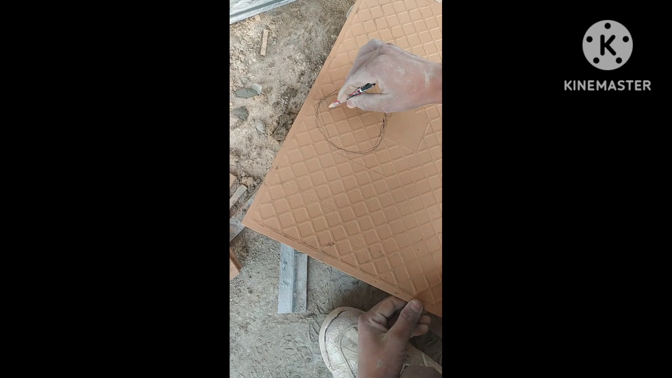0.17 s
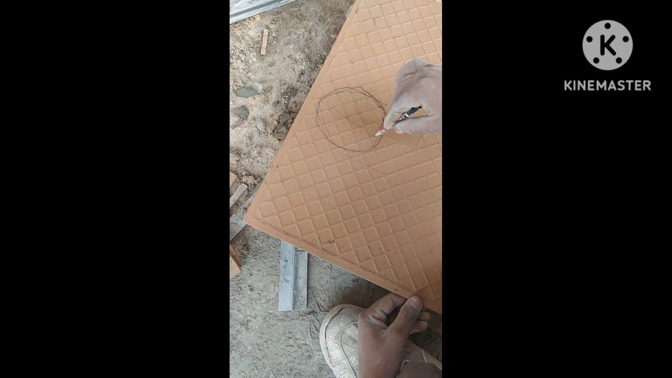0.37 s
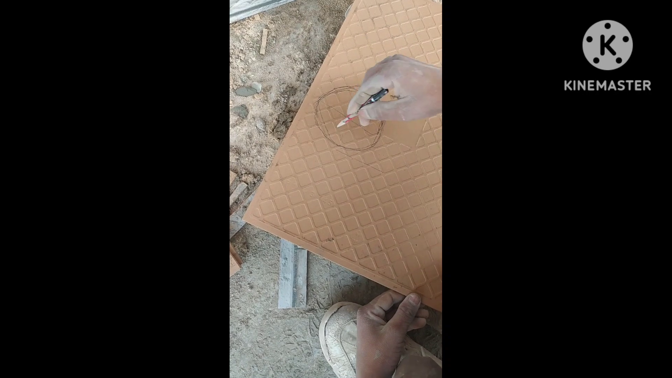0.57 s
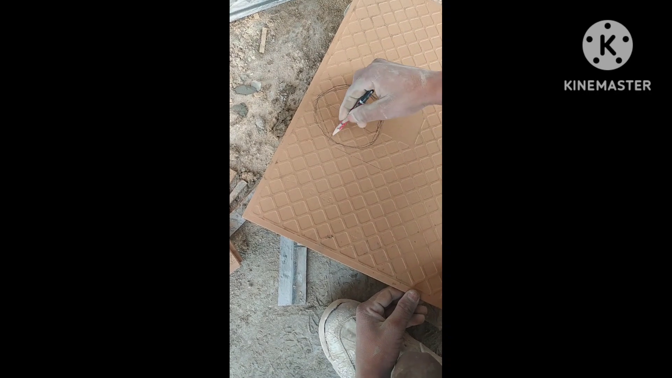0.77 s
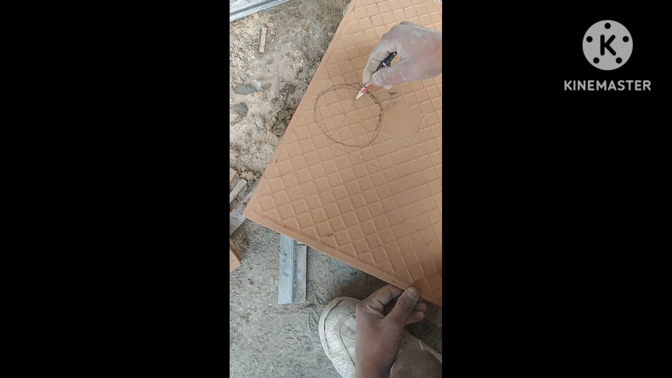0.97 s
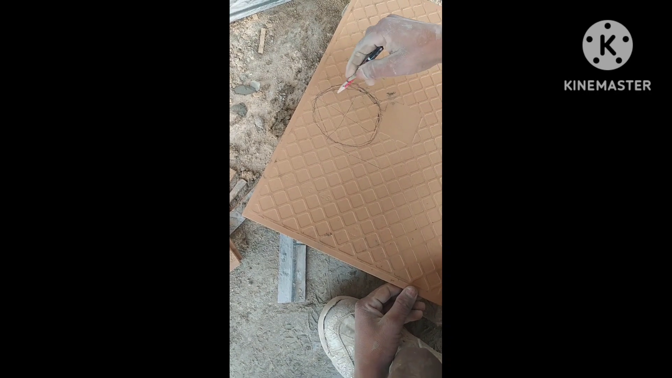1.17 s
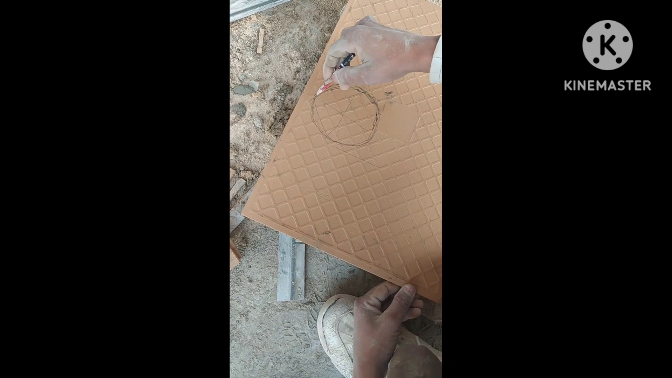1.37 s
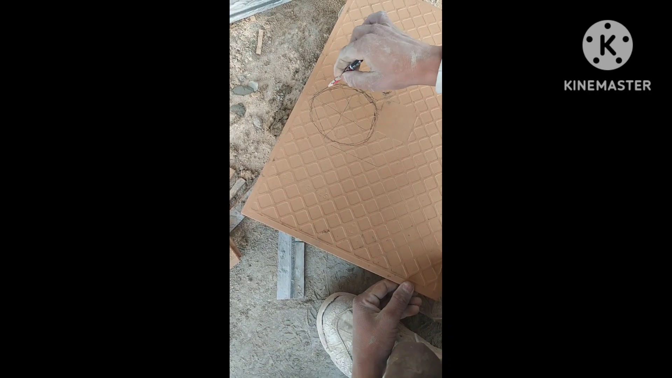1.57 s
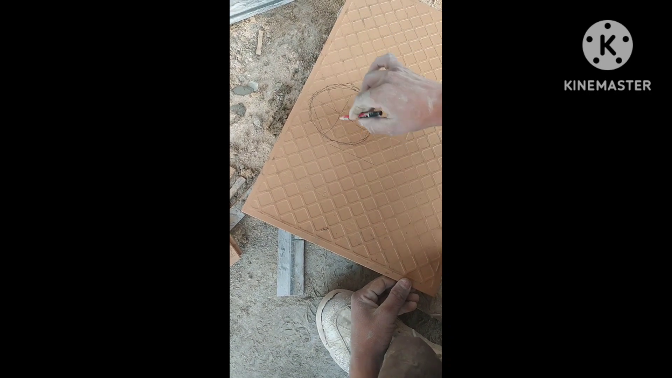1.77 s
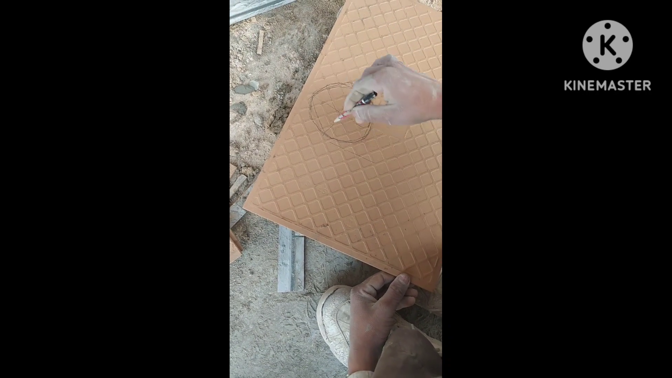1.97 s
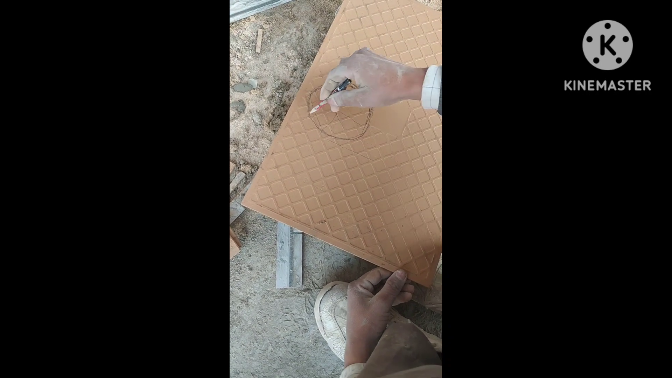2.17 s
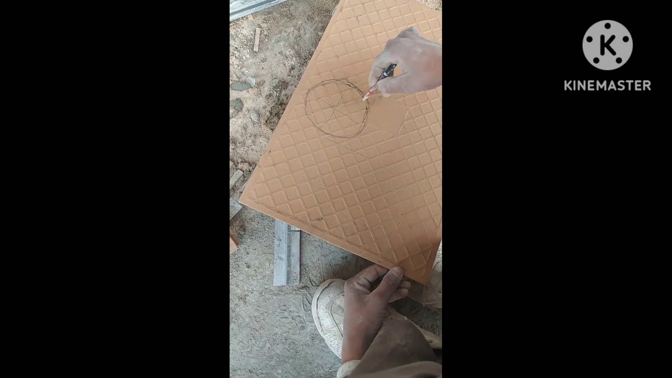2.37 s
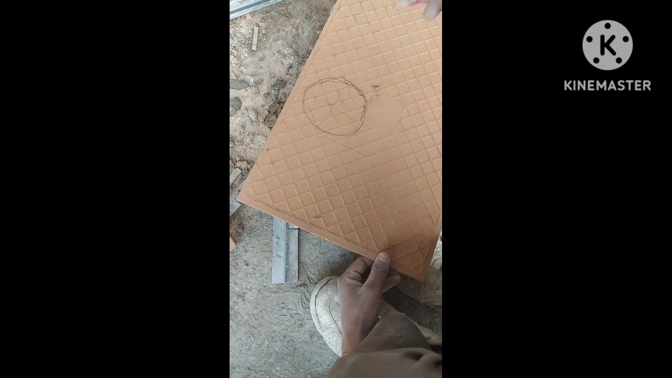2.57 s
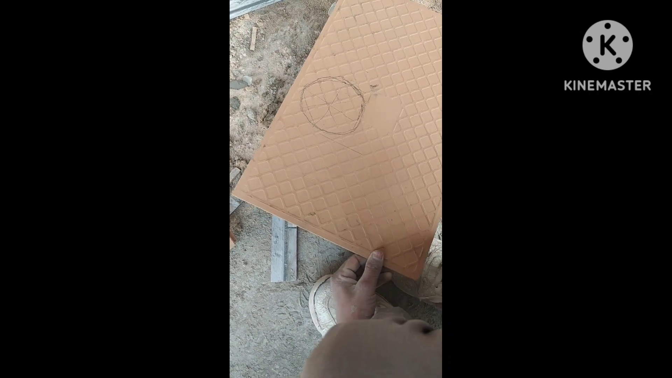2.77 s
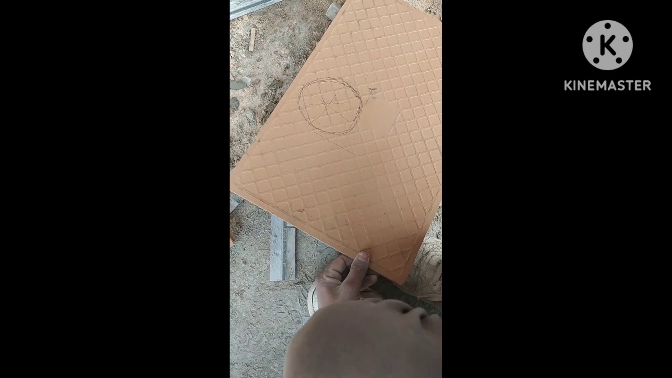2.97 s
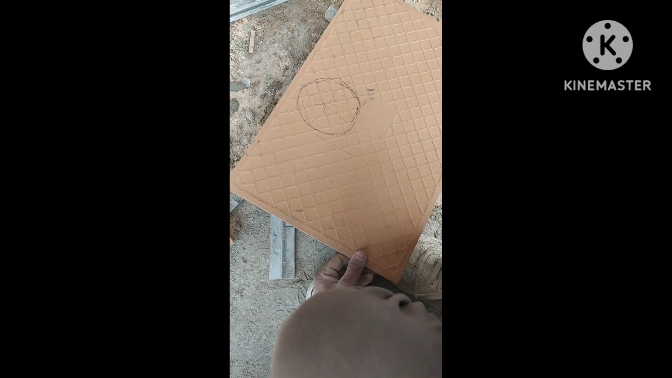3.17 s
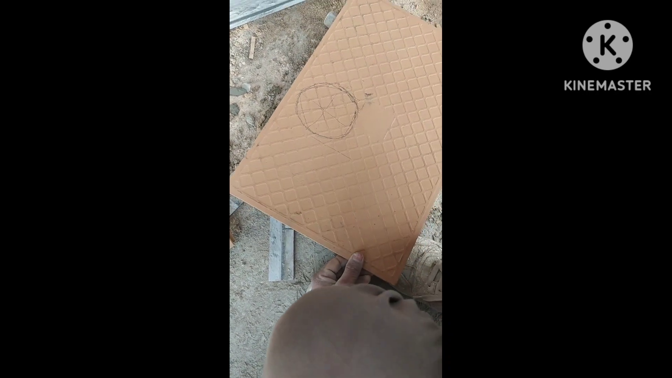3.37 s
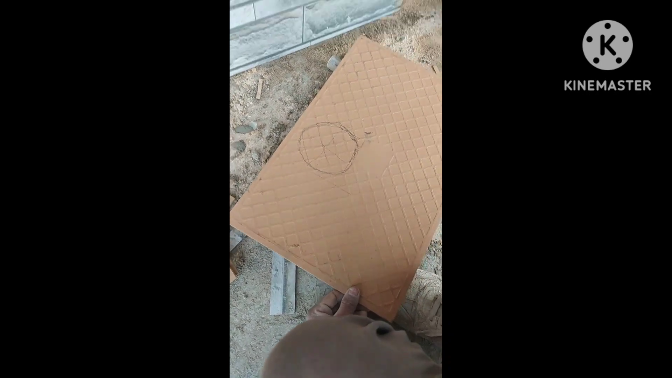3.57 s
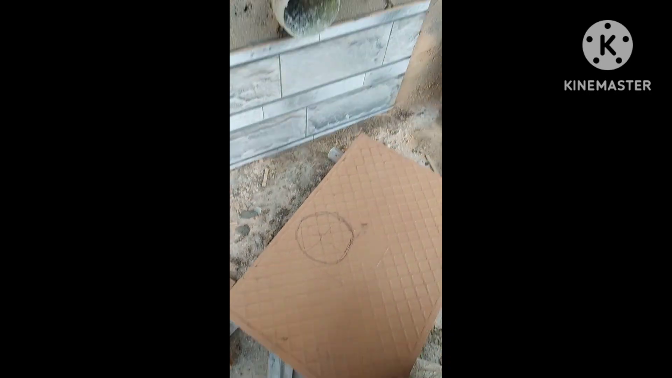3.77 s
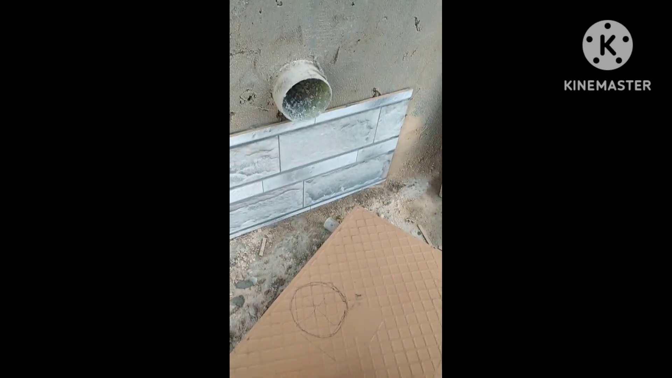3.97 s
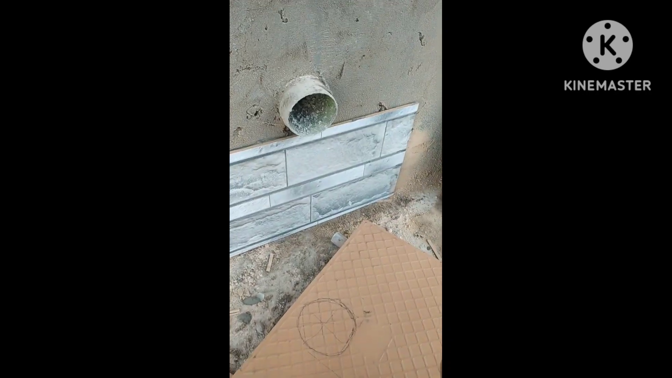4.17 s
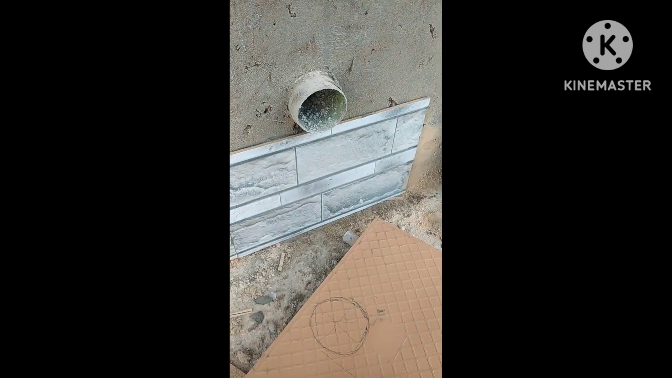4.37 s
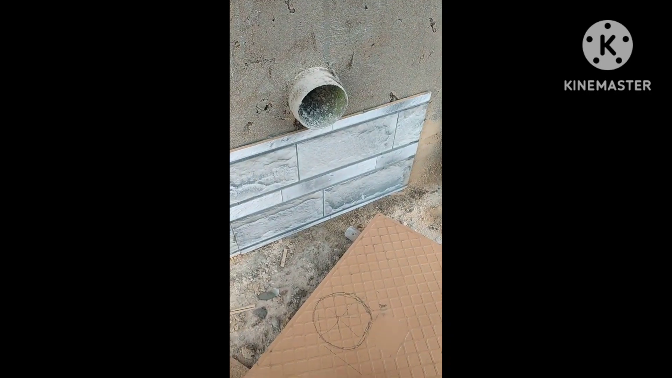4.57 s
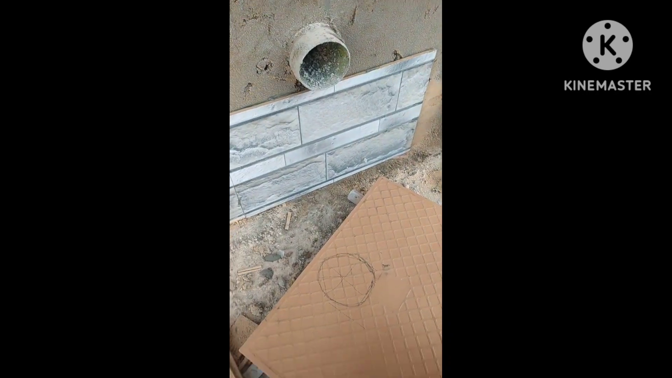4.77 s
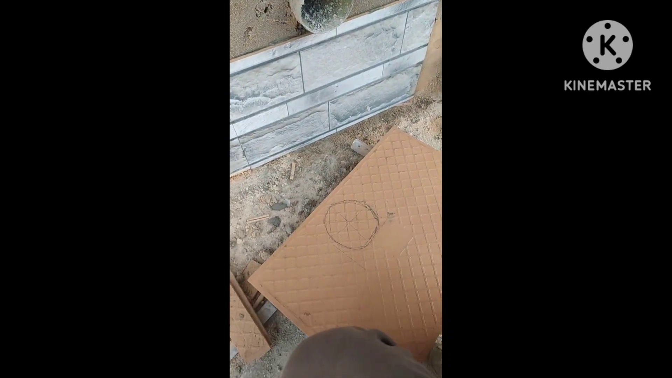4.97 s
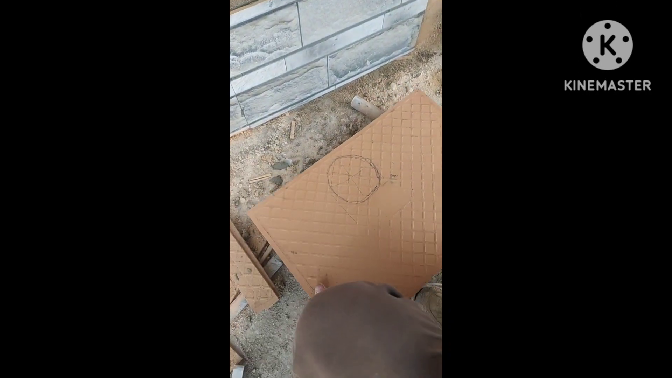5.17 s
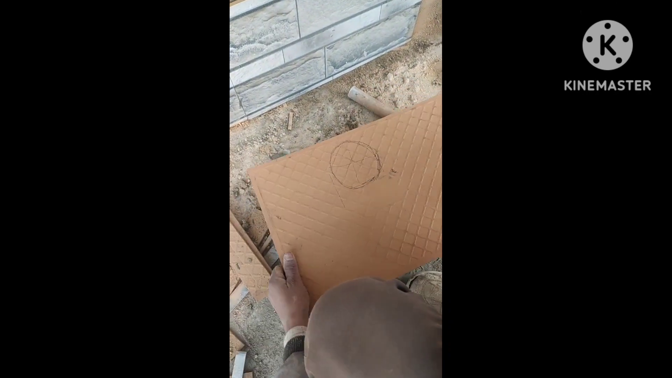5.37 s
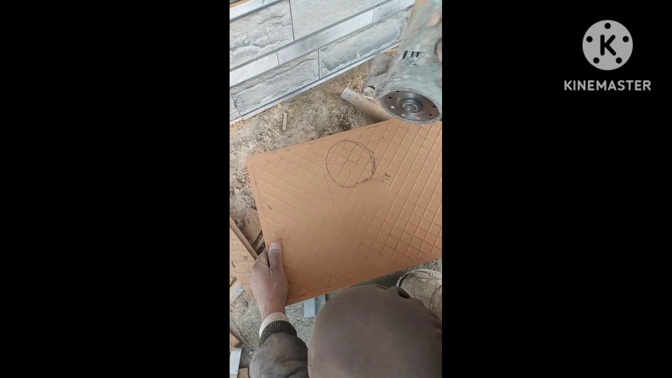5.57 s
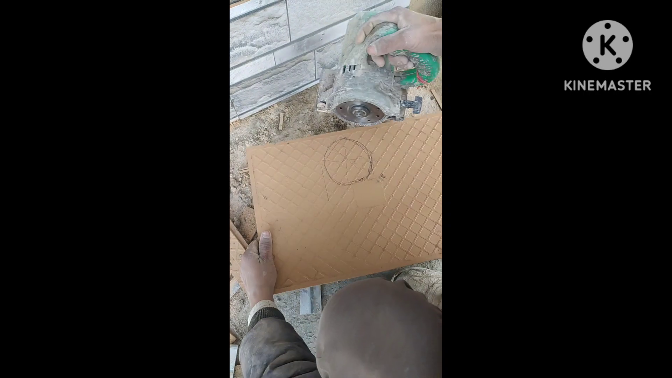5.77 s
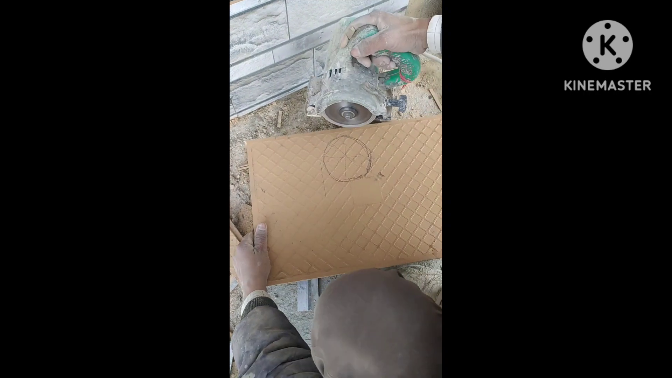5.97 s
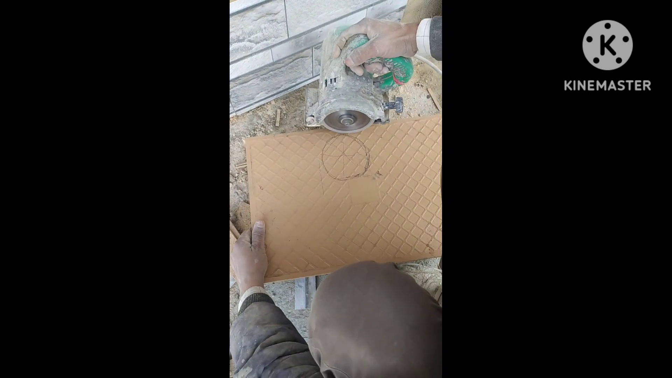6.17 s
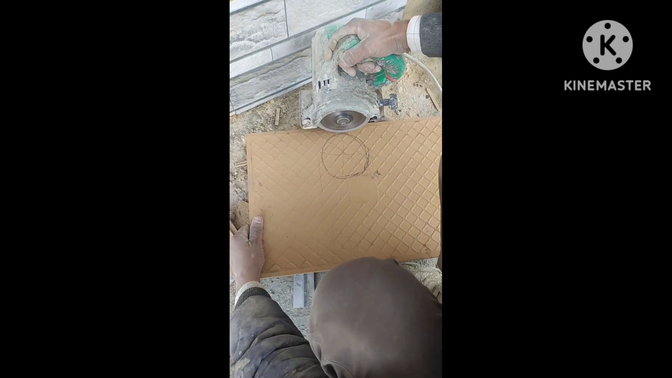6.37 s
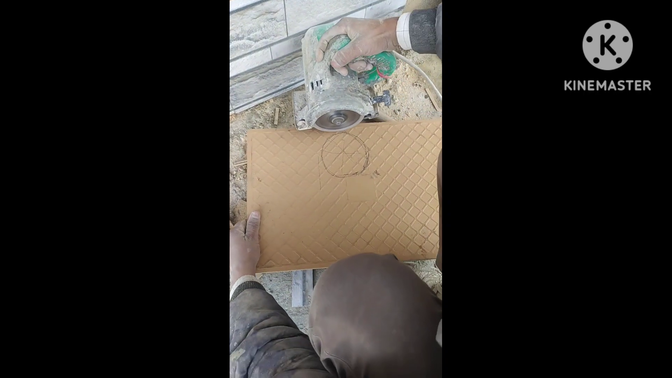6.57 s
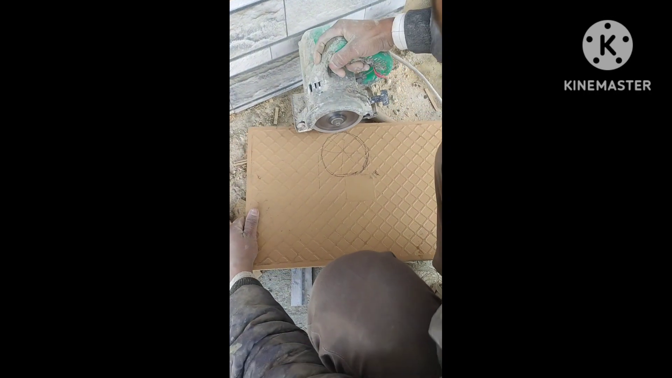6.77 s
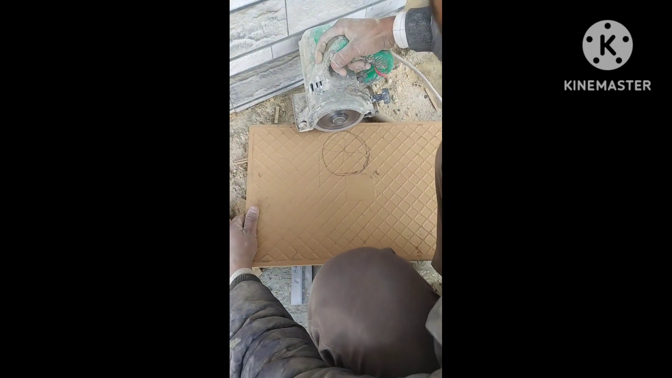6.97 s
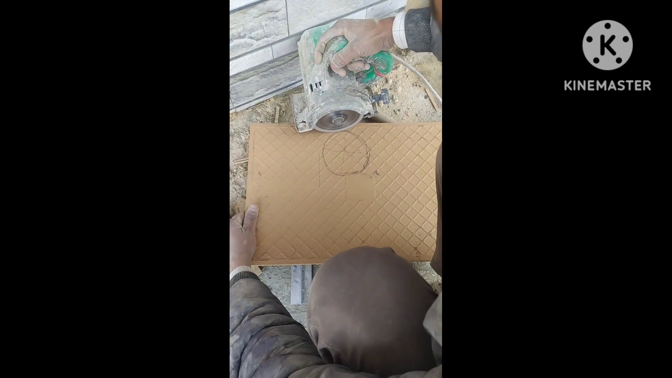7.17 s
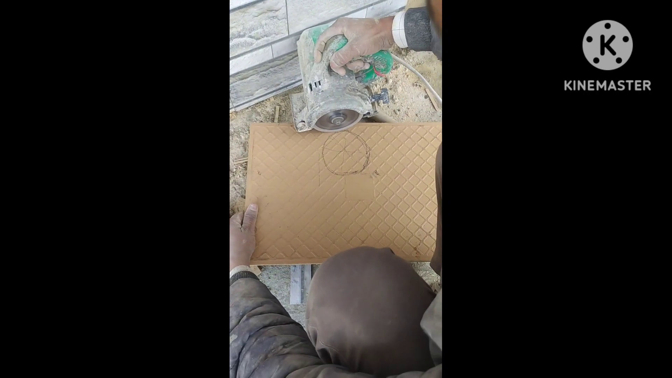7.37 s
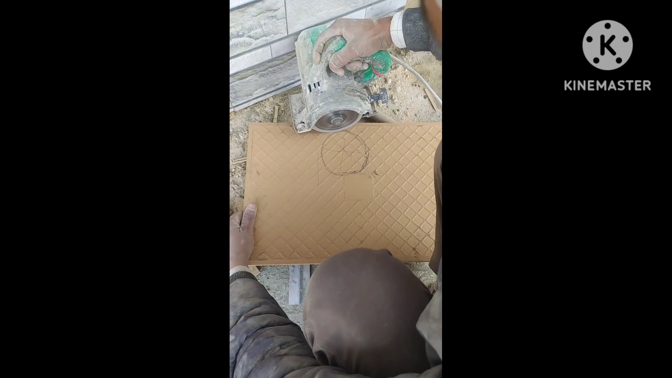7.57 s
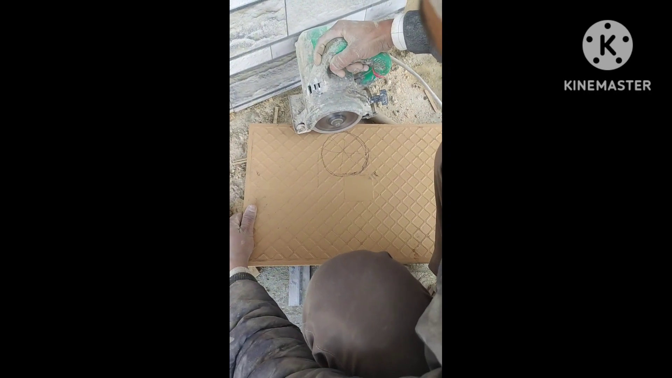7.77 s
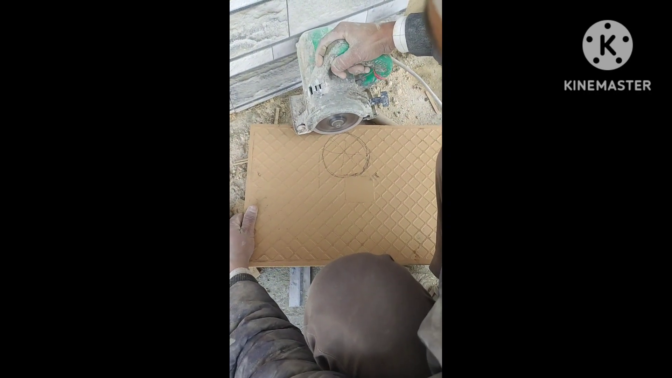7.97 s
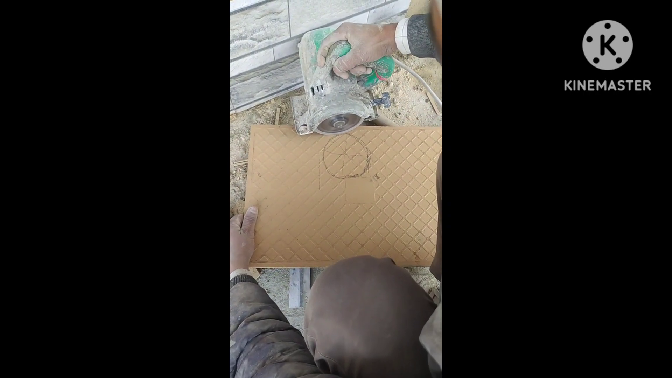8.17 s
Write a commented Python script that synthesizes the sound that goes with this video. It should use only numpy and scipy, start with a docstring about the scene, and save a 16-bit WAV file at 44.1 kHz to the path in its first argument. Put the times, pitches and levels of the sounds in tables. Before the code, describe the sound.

A low building-site murmur with faint steady machine hums runs underneath. From about 0.2 to 3 seconds a pencil makes brief, dry scratches and small ticks on a clay tile, lightly ringing it, with a hollow knock near 1.0. Behind it a spade hits gritty ground from 0.3 seconds, roughly every 0.6 seconds until 5.7: a thud with short wall echoes and a hiss of grit, early blows brighter, later ones duller. Sparse handling rubs follow at 3.6 to 4 and from 4.7; a faint tone passes near 4.2. At 5.2 the tile is knocked and scraped, singing in stick-slip chirps around 5.45 to 5.75. At 5.9 a handheld cutter jolts on, its pitch climbing quickly, then more slowly, to a loud whine with gear rattle and fan rush. A tile hum joins around 6.6 to 7.3, with a tiny dip at 7.25; the motor keeps running to the end at about 8.

```python
"""A building site: a pencil marks a clay tile while someone further off digs in gritty ground at a steady pace.
Scratches and ticks ring the tile's modes; spade blows ring ground and blade, return off walls and shed grit.
The tile is dragged into place and sings as it sticks and slips. Then a handheld cutter runs up to speed
beside it: gear, fan and housing noise under tones that follow the motor's turns.
Two microphone ports hear it all, the left one bright with a sharp treble resonance, the right one dull."""
import sys
import numpy as np
from scipy import signal
from scipy.fft import rfft, irfft, next_fast_len
from scipy.io import wavfile
from scipy.ndimage import uniform_filter1d

SR = 44100
rng = np.random.default_rng(int(sys.argv[2]) if len(sys.argv) > 2 else 0)


def file_out(sig):
    """Save sig as 16-bit WAV at sys.argv[1]."""
    # one column per channel
    cols = np.atleast_2d(sig).T
    # limit, then scale
    lim = np.clip(cols, -1, 1)
    pcm = np.round(lim * 32767).astype(np.int16)
    wavfile.write(sys.argv[1], SR, pcm)


N = 362943
SIZE = next_fast_len(N + 4096)
T = np.arange(N) / SR
HZ = np.maximum(np.arange(SIZE // 2 + 1) * SR / SIZE, 1)

# All noise colours give relative levels; the coloured noise is scaled to unit rms.
# site murmur: hz, level_db
SITE_COLOUR = [(15, -37), (25, 1), (106, 0), (183, -8), (243, -1.5), (314, 2), (2420, -14), (3560, -19),
               (4500, -27), (7350, -30.5), (9270, -24.5), (10800, -28.5), (12000, -39), (15600, -82),
               (22000, -120)]
SITE_DB = -45.5
# distant machinery hums: pitch_hz, level_db, phase_wobble_rad
HUMS = [(157.2, -52, 0.48), (195, -50, 0.17)]
# hollow knock: start_s, level_db; its colour: hz, level_db; its own note: pitch_hz, above_knock_db, t60_s
KNOCK = [(1.036, -25.5)]
KNOCK_COLOUR = [(90, -16), (150, -3.5), (225, 3), (290, -14.5), (450, -16), (900, -81)]
KNOCK_RING = (224, 3.9, .16)
# a faint tone passes: time_s, level_db
FAR_TONE = [(4.1, -58), (4.17, -44.5), (4.36, -52), (4.44, -67)]
FAR_TONE_HZ = 320

# strokes of pencil, hand and tile: start_s, length_s, first_scratch_db, last_scratch_db, mode_drive_vs_scratch_db
STROKES = [(0.234, 0.2, -46.5, -37, -22.5), (0.441, 0.049, -33, -37.5, -31),
           (0.797, 0.029, -34.5, -55, -15), (0.862, 0.15, -43.5, -35, -23), (0.995, 0.13, -41, -42.5, -19),
           (1.755, 0.035, -59, -40.5, -23), (1.792, 0.15, -40, -38, -20), (2.308, 0.058, -40, -39.5, -26),
           (2.362, 0.093, -35.5, -40.5, -30), (2.435, 0.033, -35, -37.5, -26.5),
           (2.754, 0.21, -58, -40.5, -28), (2.968, 0.076, -59, -43, -31), (3.171, 0.029, -43, -51, -41),
           (3.602, 0.22, -52.5, -40.5, -42), (3.833, 0.081, -40, -32.5, -50), (3.904, 0.22, -59, -60.5, -9),
           (4.749, 0.22, -51.5, -41, -31), (4.98, 0.22, -46, -38, -25), (5.221, 0.035, -19, -55, -32),
           (5.243, 0.14, -45, -40, -21.5), (5.395, 0.079, -30, -32.5, -26.5), (5.481, 0.23, -33, -54, -23),
           (5.684, 0.22, -48, -47, -22.5)]
TOUCH_S, LIFT_DB_PER_S = 0.0086, 503  # a stroke sets in, and dies as the tip lifts
# rubbing colour: hz, level_db
RUB_COLOUR = [(290, -36), (500, -34), (841, -19), (931, -40), (1030, -5), (2120, -3.5), (2490, -8),
              (3470, -7), (4690, -12), (7240, -8), (9670, 2), (13000, -16), (15800, -18)]
# pencil tip and grit ticking on the tile: start_s, knock_into_modes_db, dry_scratch_db; tick colour: hz, level_db
TICKS = [(0.177, -62, -56), (0.248, -57, -33.5), (0.339, -52.5, -31), (0.398, -53, -41), (0.423, -53, -40),
         (0.447, -57, -26), (0.471, -49, -36), (0.803, -54.5, -47), (0.953, -54, -36), (1.012, -55, -23.5),
         (1.035, -57, -40), (1.087, -59.5, -35), (1.799, -54.5, -37), (1.876, -69, -36), (1.933, -66, -35),
         (2.261, -55, -31.5), (2.318, -62, -22.5), (2.369, -62, -26.5), (2.443, -64, -40), (2.95, -65, -35),
         (3.899, -78, -23), (4.565, -56.5, -42.5), (5.221, -52, -22), (5.395, -66, -34), (5.42, -67, -28),
         (5.486, -59, -39), (5.495, -63, -42)]
TICK_COLOUR = [(500, -24), (1030, -19), (2400, -4), (3600, -21), (5300, -4), (7300, -13), (9200, 6),
               (10200, 0), (12500, -20), (15800, -28)]
TICK_T60_S = 0.046
# tile modes: pitch_hz, level_db, t60_s
TILE_MODES = [(624, -10, 0.14), (712, -8, 0.15), (864, -4, 0.2), (958, -12, 0.15), (1010, 0, 0.18),
              (1058, -6, 0.2), (1156, -3, .12), (1267, -5, 0.07), (1445, -4, 0.099), (1920, -6, 0.05),
              (2390, -8, .05), (2525, -3, 0.09), (2800, -7, 0.04), (3140, -8, 0.04), (4160, -11, 0.04),
              (4760, -5, .07), (5220, -7, .04), (5480, -8, .04), (5670, -7, .06), (6620, -7, .04),
              (7640, -8, .04), (8900, -9, .04), (9850, -8, .07)]
# where the tip rests decides how well the low modes are driven: time_s, lift_db
LOW_MODES_LIFT = [(0.2, -1), (0.9, -3), (1.05, -2), (1.1, 2), (1.8, -2), (2.25, 0), (2.33, 8), (2.5, 8),
                  (2.7, 0), (5.5, 0)]
LOW_MODES_HZ = 1500  # modes below this count as low

# spade blows: start_s, thud_db, crack_db, grit_db (before rise and fall), bright_above_thud_db
BLOWS = [(0.27, -28, -29.5, -27.5, 3.5), (0.849, -28, -29.5, -34, 7), (1.426, -26.5, -29.5, -27, 5),
         (2.0105, -25.5, -30, -26, 3), (2.604, -24, -33.5, -27, -2), (3.199, -23.5, -34.5, -26.5, -11),
         (3.804, -24, -33.5, -27.5, -28), (4.434, -24.5, -32.5, -26, -15), (5.051, -27, -29.5, -29.5, -15),
         (5.685, -26, -37.5, -26.5, -34)]
# arrivals of each blow, direct and then off the walls: delay_s, level_db
ECHOES = [(.0012, -14), (.0035, -2.5), (.0098, -5.5), (.0192, -6.5), (.025, -11), (.032, -6.5),
          (.0383, -16), (.0447, -15), (.0508, -8.5), (.0617, -13), (.0677, -16), (.0937, -20)]
ECHO_SPREAD_DB = 0.5
# what a blow rings in ground, bright knock and blade: pitch_hz, above_its_layer_db, t60_s
GROUND_MODES = [(195.8, -2, 0.21), (304, 3.5, 0.047)]
KNOCK_MODES = [(457, 2.9, 0.055), (566, 5.9, 0.053), (698, 2, 0.041)]
BLADE_MODES = [(1290, 0, 0.029), (2155, 0, 0.05), (2580, -1.5, 0.035), (3880, -9.5, 0.043)]
# colours of thud, its brighter part and sliding grit: hz, level_db
THUD_COLOUR = [(35, -50), (70, -27), (130, -9.5), (190, -0.5), (320, -2.5), (450, -5), (650, -11),
               (950, -20.5), (2500, -41), (4000, -83)]
THUD_TOP_COLOUR = [(250, -68), (420, 16), (600, 21), (800, -9), (950, -16), (2500, -10), (4000, -73)]
GRIT_COLOUR = [(530, -23), (900, -3), (1010, 0.5), (2510, -7), (3540, -3), (4330, -9.5), (7860, -15),
               (9400, 5.5), (10800, -12), (11600, -34), (15500, -35)]
THUD_T60_S, YARD_T60_S, CRACK_T60_S = 0.4, 1.22, 0.079
THUD_NOISE_DB = -2.5  # lumpy noise against the rings
YARD_DB, BRIGHT_TAIL_DB = -5.5, -5  # against the thud and its bright part
CONTACT_HZ = 1080  # soft soil dulls the knock above this
GRIT_RISE_S, GRIT_FALL_S = 0.083, 0.1

# slips of the dragged tile: peak_s, fall_db_per_s (scaled per band), low_hz, low_db, middle_hz, middle_db,
# upper_db, squeal_db
SLIPS = [(5.453, 500, 699, -24, 1040, -32, -44, -40), (5.497, 500, 703.6, -21.5, 1002, -41, -43, -35),
         (5.523, 300, 702, -33, 1043, -28, -49, -58), (5.535, 400, 721, -22, 1030, -19.5, -45, -52),
         (5.57, 490, 719, -46, 998, -46, -38, -53), (5.603, 300, 706, -24, 1007, -25, -58, -65),
         (5.622, 163, 696, -14.5, 993, -33, -65, -75), (5.74, 1200, 685, -32, 996, -51, -65, -75)]
SLIP_RISE_DB_PER_S = 1200
LOW_FALL, MIDDLE_FALL, SQUEAL_FALL = 0.91, 1.05, 0.84  # factors on the fall; upper modes use the middle one
# modes that sing above the low and middle ones: pitch_hz, level_db
UPPER_MODES = [(500, -4), (1205, 7), (1450, 6), (1660, -10), (2000, -8), (2420, -6), (2880, -4.5)]
SQUEAL_MODES = [(4080, -7), (4655, 0), (5120, -1), (5450, -4), (5695, 2), (6400, -7)]
# the tile is on the move: time_s, share
DRAG = [(5.445, 0), (5.455, 1), (5.745, 1), (5.765, 0)]

SWITCH_S, TOP_TURNS_PER_S = 5.917, 547.7
# speed still missing, in a quick and a slow stage: missing_turns_per_s, time_constant_s
RUN_UP = [(162.5, .115), (261.4, .555)]
GEAR_RATIO = .4185  # spindle turns per armature turn
# spindle overtones: multiple, against_spindle_db
SPINDLE_ORDERS = [(2, -7), (3, -2)]
# how the housing sounds each tone: armature_turns_per_s, unbalance_db, octave_db, third_overtone_db, spindle_db
TONES_BY_SPEED = [(120, -75, -80, -70, -70), (278, -57, -60, -43, -69), (330, -36, -29, -44, -54),
                  (401, -16.5, -34, -28, -35), (433, -18, -34, -22, -36), (448, -15.5, -36.5, -45, -30.5),
                  (500, -23, -32.5, -37, -34.5), (511, -19, -29.5, -50, -33.5), (528, -24, -35, -50, -28),
                  (525, -22, -21, -48, -30), (535, -24.5, -34, -45, -25)]
# commutator whine: armature_turns_per_s, level_db
WHINE_BY_SPEED = [(120, -52), (250, -36), (300, -29), (400, -29), (445, -29), (517, -29), (523, -55)]
SEGMENTS = 30  # commutator bars
WHINE_SCATTER = .005  # sparking brushes smear the whine's pitch by this share
# colours of gear rattle, fan air and housing rumble: hz, level_db
GEARS_COLOUR = [(470, -33), (800, -39), (940, -15), (1140, -5), (1280, -7), (1410, -3), (1600, -2),
                (1780, 0), (2150, -0.5), (2410, 1), (2810, -1.5), (3180, -10), (3460, -8.5), (3820, -9.5),
                (5000, -14), (6500, -61), (11000, -120)]
FAN_COLOUR = [(2060, -53), (3500, -7), (4400, -20.5), (5180, -8.5), (6270, -8), (6760, -7.5), (9400, 0.5),
              (10400, -8.5), (12100, -15), (13200, -14.5), (14300, -20), (15400, -21), (15900, -51)]
HOUSING_COLOUR = [(15, -53), (25, -16), (119, -13.5), (220, -2), (273, -6.5), (484, 4), (531, -2),
                  (583, 2.5), (669, 3.5), (1000, -5.5), (1300, 1.5), (2200, -120)]
GEARS_DB, FAN_DB, HOUSING_DB = -15, -17, -18.5  # at top speed
GEARS_POWER, FAN_POWER, HOUSING_POWER = 0.6, 0.63, 1.44  # amplitude grows with speed to this power
FAN_BLADES, FAN_BAND_HZ, FAN_BAND_DB = 18, 700, -5.5
MAINS_THROB_HZ, THROB_FADE_S = 98, .08
KICK_DB, KICK_S = 13, 0.014  # jolt at the switch
DIP_S, DIP_DB, DIP_IN_S, DIP_OUT_S = 7.255, -4, 0.015, 0.1  # the motor noise dips briefly
# the housing rings as the motor kicks: pitch_hz, level_db, t60_s
START_GROAN = (390, -26.5, 1)
# casing resonances: pitch_hz, width_hz, lift_db
CASING = [(1292, 90, 4), (1800, 110, 3), (2350, 110, 3), (2750, 70, 3), (3350, 90, 3), (3540, 65, 3),
          (4110, 90, 2.5), (4660, 75, 2.5), (6287, 65, 3), (6500, 48, 3.5), (9250, 150, 2), (9657, 50, 4),
          (10810, 90, 4)]
PATCHY_DB = 1.3  # spread of each half octave's random swells
# the tile hums along with the motor: time_s, pitch_hz, level_db
TILE_HUM = [(6.53, 686, -46), (6.6, 686, -17.5), (6.75, 699, -14), (6.87, 702, -20.5), (7.0, 696, -23),
            (7.03, 691.5, -43), (7.06, 685, -22.5), (7.33, 694, -30)]

# left port above right port: hz, level_db
SITE_BALANCE = [(60, 4), (400, 2), (1300, 6), (2400, 7.5), (4400, 14.5), (7000, 22.5), (10000, 38),
                (15000, 27)]
CUTTER_BALANCE = [(60, 18), (140, 9), (210, -6), (330, 0.5), (500, -7), (770, -1), (1500, 1.5), (3000, 3),
                  (6000, 9), (10000, 23.5), (15000, 3.5)]
# left-right likeness, below zero heard as zero: hz, share
SITE_ALIKE = [(60, 1), (180, 0.95), (550, 0.56), (1650, 0.1), (4970, -0.67), (15000, -0.081)]
CUTTER_ALIKE = [(60, 0), (130, 0.12), (290, 0.38), (640, 0.51), (1400, 0.54), (2500, 0.25), (4000, 0.082),
                (8000, 0), (15000, 0.077)]
LEFT_LAG_S = .00009
# left port resonance: pitch_hz, width_hz, lift_db
PORT = (9480, 340, 2.16)
CUTOFF_HZ = 15750


def amp(db):
    """dB to gain."""
    return 10 ** (np.asarray(db) / 20)


def rms_one(x):
    """Scale to unit rms."""
    return x / np.sqrt(np.mean(x ** 2) + 1e-20)


def in_time(rows):
    """Columns of a curve, sample by sample."""
    s, *columns = np.transpose(rows)
    return [np.interp(T, s, c) for c in columns]


def during(rows, fade=0.0087):
    """One while a curve lasts, with short fades in seconds."""
    return np.clip(np.minimum(T - rows[0][0], rows[-1][0] - T) / fade, 0, 1)


def at_hz(points):
    """A spectrum table read at every frequency, along a log axis."""
    hz, value = np.transpose(points)
    return np.interp(np.log(HZ), np.log(hz), value)


def colour(x, spectrum):
    """Filter by a spectrum, to unit rms."""
    return rms_one(irfft(rfft(x, SIZE) * amp(at_hz(spectrum)), SIZE)[..., :N])


def drift(rate_hz):
    """Slow random wander of spread one, made at a fortieth of the sample rate."""
    r = np.exp(-80 * np.pi * rate_hz / SR)
    white = rng.standard_normal(N // 40 + 2002)
    slow = signal.lfilter([1], [1, -2 * r, r * r], white)[2000:]
    return np.interp(np.arange(N) / 40, np.arange(len(slow)), rms_one(slow))


def grains(per_s, spread_db):
    """Two unrelated streams of random clicks that share their sizes and moments."""
    sizes = amp(spread_db * np.minimum(rng.exponential(1, N), 5))
    sizes *= rng.random(N) < per_s / SR
    return sizes * rng.standard_normal((2, N))


def ring(x, hz, t60):
    """A unit click sets a decaying sine of height 1 ringing."""
    r, w = amp(-60 / (t60 * SR)), 2 * np.pi * hz / SR
    return signal.lfilter([0, np.sin(w)], [1, -2 * r * np.cos(w), r * r], x + 1e-18)


def clicks_at(times, levels_db):
    """Single-sample clicks at given times and levels."""
    clicks = np.zeros(N)
    clicks[(np.asarray(times) * SR).astype(int)] = amp(levels_db)
    return clicks


def dying(times, levels_db, t60):
    """Envelope that jumps at each time and decays."""
    return signal.lfilter([1], [1, -amp(-60 / (t60 * SR))], clicks_at(times, levels_db) + 1e-18)


def swell(envelope, size):
    """Causal smoothing of an envelope's jumps over size samples."""
    return uniform_filter1d(envelope, size=size, origin=(size - 1) // 2)


def tone(hz, wobble):
    """A sine of unit rms whose phase wanders by wobble radians."""
    return np.sqrt(2) * np.sin(2 * np.pi * np.cumsum(hz * np.ones(N)) / SR + wobble * drift(31))


def background():
    """Site murmur, wavering hums, a hollow knock and a faint far tone."""
    air = amp(SITE_DB + 2.0 * drift(11)) * colour(rng.standard_normal((2, N)), SITE_COLOUR)
    hums = sum(amp(db + 3 * drift(5)) * tone(hz, wobble) for hz, db, wobble in HUMS)
    s, knock_db = np.transpose(KNOCK)
    knock = swell(dying(s, knock_db, 1.0), size=440) * colour(rng.standard_normal(N), KNOCK_COLOUR)
    ring_hz, ring_db, ring_t60 = KNOCK_RING
    knock += ring(clicks_at(s, knock_db + ring_db), ring_hz, ring_t60)
    far = during(FAR_TONE) * amp(in_time(FAR_TONE)[0]) * tone(FAR_TONE_HZ, wobble=0.11)
    return air, hums + far + knock


def strokes():
    """Each stroke glides from first to last level, then dies; returns scratch and drive of the modes."""
    scratch, drive = np.zeros(N), np.zeros(N)
    for s, length, first_db, last_db, drive_db in STROKES:
        near = slice(int(s * SR), int((s + length + .3) * SR))
        t = T[near] - s
        level_db = first_db + (last_db - first_db) * np.minimum(t / length, 1)
        level_db -= LIFT_DB_PER_S * np.maximum(t - length, 0)
        gain = np.clip(t / TOUCH_S, 0, 1) * amp(level_db)
        scratch[near] += gain
        drive[near] += gain * amp(drive_db)
    return scratch, drive


def tile():
    """Rubbing and ticks sound directly and through the tile's modes."""
    # the tip sticks and slips: sudden bursts that die within milliseconds
    jumps = (rng.random(N) < 90 / SR) * np.minimum(rng.exponential(1, N), 2.5)
    bursts = rms_one(2.6 + signal.lfilter([1], [1, -amp(-60 / (.06 * SR))], jumps))
    scratch, drive = bursts * strokes()
    s, knock_db, dry_db = np.transpose(TICKS)
    white = rng.standard_normal((2, N))
    direct = scratch * colour(grains(5000, spread_db=0.6), RUB_COLOUR)
    direct += swell(dying(s, dry_db, TICK_T60_S), size=40) * colour(white, TICK_COLOUR)
    force = drive * grains(2500, spread_db=2.0) + dying(s, knock_db, 0.02) * white[::-1]
    low_lift_db, = in_time(LOW_MODES_LIFT)
    ringing = 0
    for hz, db, t60 in TILE_MODES:
        # the contact point travels, so each mode is driven now more, now less
        drive_db = 2.5 * drift(12) + low_lift_db * (hz < LOW_MODES_HZ)
        ringing = ringing + amp(db) * ring(force * amp(drive_db), hz, t60)
    return direct + ringing


def struck(modes, blow_s, blow_db, count):
    """The first arrivals of every blow ring the modes, each time a little differently."""
    delay, echo_db = np.transpose(ECHOES)[:, :count]
    arrival_s = blow_s[:, None] + delay
    out = 0
    for hz, db, t60 in modes:
        spread_db = ECHO_SPREAD_DB * rng.standard_normal(arrival_s.shape)
        out = out + ring(clicks_at(arrival_s, blow_db[:, None] + db + echo_db + spread_db), hz, t60)
    return out


def spade():
    """A knock returns from the walls over a lumpy thud and yard tail; a crack; grit slides off the blade."""
    s, thud_db, crack_db, grit_db, bright_db = np.transpose(BLOWS)
    top_db = thud_db + bright_db
    lumps = grains(4000, spread_db=-1.0)
    body = dying(s, thud_db, THUD_T60_S) + dying(s, thud_db + YARD_DB, YARD_T60_S)
    thud = amp(THUD_NOISE_DB) * swell(body, size=500) * colour(lumps, THUD_COLOUR)
    thud += swell(dying(s, top_db + BRIGHT_TAIL_DB, 0.44), size=700) * colour(lumps, THUD_TOP_COLOUR)
    knock = struck(GROUND_MODES, s, thud_db, len(ECHOES)) + struck(KNOCK_MODES, s, top_db, len(ECHOES))
    thud += signal.sosfilt(signal.butter(2, CONTACT_HZ, fs=SR, output="sos"), knock)

    crack_colour = [(500, -17), (1500, 4.5), (3000, -2.5), (5000, -22), (12000, -28)]  # hz, level_db
    crack = colour(rng.standard_normal((2, N)), crack_colour)
    crack = swell(dying(s, crack_db, CRACK_T60_S), size=220) * crack
    blade = struck(BLADE_MODES, s, crack_db, count=3)

    late = T[:SR]
    slide = (1 - np.exp(-(late / GRIT_RISE_S) ** 2)) * np.exp(-late / GRIT_FALL_S)
    slides = signal.fftconvolve(clicks_at(s, grit_db), slide)[:N]
    grit = slides * colour(grains(9000, spread_db=-1.0), GRIT_COLOUR)
    return thud + crack + blade + grit


def singing():
    """Stick-slip while dragging locks onto the tile's low modes; each slip swells and fades."""
    s, fall, low_hz, low_db, middle_hz, middle_db, upper_db, squeal_db = np.transpose(SLIPS)

    def swells(peak_db, faster):
        """Sum of the slips' envelopes, straight in dB up and down."""
        total = 0
        for at, rate, db in zip(s, fall, peak_db):
            slope_db = np.minimum(SLIP_RISE_DB_PER_S * (T - at), faster * rate * (at - T))
            total = total + amp(np.maximum(db + slope_db, -200))
        return total

    upper = sum(amp(db + 3.5 * drift(15)) * tone(hz, wobble=0.8) for hz, db in UPPER_MODES)
    squeal = sum(amp(db + 3 * drift(30)) * tone(hz, wobble=1.2) for hz, db in SQUEAL_MODES)
    song = swells(squeal_db, SQUEAL_FALL) * squeal + swells(upper_db, MIDDLE_FALL) * upper
    song += swells(low_db, LOW_FALL) * tone(np.interp(T, s, low_hz), wobble=0.43)
    song += swells(middle_db, MIDDLE_FALL) * tone(np.interp(T, s, middle_hz), wobble=0.2)
    return in_time(DRAG)[0] * song


def motor_noise(turns, angle, since):
    """Gear rattle, chopped fan air and housing rumble, each growing with speed."""
    speed_db = 20 * np.log10(turns / TOP_TURNS_PER_S)
    dip_db = DIP_DB * np.exp(np.minimum((T - DIP_S) / DIP_IN_S, (DIP_S - T) / DIP_OUT_S))
    kick_db = KICK_DB * np.exp(-since / KICK_S)
    gears_db = GEARS_DB + GEARS_POWER * speed_db + dip_db + kick_db
    fan_db = FAN_DB + FAN_POWER * speed_db + dip_db + kick_db
    housing_db = HOUSING_DB + HOUSING_POWER * speed_db + dip_db
    # torque pulses at twice the mains rate knock the slack gears until speed evens them out
    throb_depth = .7 * np.exp(-since / THROB_FADE_S) + .04
    throb = 1 - throb_depth * np.cos(2 * np.pi * MAINS_THROB_HZ * since)
    # the blade runs slightly out of true
    runout = 1 + 0.022 * np.sin(GEAR_RATIO * angle)
    rattle = colour(grains(7000, spread_db=-1.5), GEARS_COLOUR)
    noise = amp(gears_db + 0.25 * drift(25)) * throb * runout * rattle
    # fan blades chop turbulent air: a broad band that rides on the blade-passing rate
    low_pass = signal.butter(2, FAN_BAND_HZ, fs=SR, output="sos")
    gusts = signal.sosfilt(low_pass, rng.standard_normal((2, N)))
    air = colour(rng.standard_normal((2, N)), FAN_COLOUR)
    air += amp(FAN_BAND_DB) * rms_one(gusts * np.sin(FAN_BLADES * angle))
    noise += amp(fan_db + 0.34 * drift(58)) * np.sqrt(np.abs(throb)) * air
    rumble = colour(rng.standard_normal((2, N)), HOUSING_COLOUR)
    return noise + amp(housing_db + 0.49 * drift(10.0)) * rumble


def motor_tones(turns):
    """Armature, spindle and commutator tones follow the turns, beside a start groan and the tile's hum."""
    speeds, *levels = np.transpose(TONES_BY_SPEED)
    unbalance_db, octave_db, third_db, spindle_db = (np.interp(turns, speeds, db) for db in levels)
    groan_hz, groan_db, groan_t60 = START_GROAN
    tones = dying([SWITCH_S], [groan_db], groan_t60) * tone(groan_hz, wobble=0.86)
    tones += amp(unbalance_db) * tone(turns, wobble=0.08)
    tones += amp(octave_db) * tone(2 * turns, wobble=0.3)
    tones += amp(third_db) * tone(3 * turns, wobble=0.3)
    spindle = tone(GEAR_RATIO * turns, wobble=0.036)
    spindle += sum(amp(db) * tone(k * GEAR_RATIO * turns, wobble=0.35) for k, db in SPINDLE_ORDERS)
    tones += amp(spindle_db) * spindle
    whine_db = np.interp(turns, *np.transpose(WHINE_BY_SPEED))
    whine_hz = SEGMENTS * turns * (1 + WHINE_SCATTER * drift(250))
    tones += amp(whine_db + 2.5 * drift(150)) * tone(whine_hz, wobble=2.5)
    hum_hz, hum_db = in_time(TILE_HUM)
    return tones + during(TILE_HUM, fade=0.034) * amp(hum_db) * tone(hum_hz, wobble=0.11)


def casing(noise):
    """The casing lifts its resonances; each half octave of the motor noise swells at random."""
    start = int(SWITCH_S * SR) - 2048
    size = next_fast_len(N - start)
    hz = np.maximum(np.arange(size // 2 + 1) * SR / size, 1)
    lift_db = sum(db / (1 + (2 * (hz - centre) / width) ** 2) for centre, width, db in CASING)
    spectrum = rfft(noise[:, start:], size) * amp(lift_db)
    place = 2 * np.log2(np.clip(hz, 500, 16000) / 500)  # half octaves above 500 Hz
    out = np.zeros((2, N))
    for band in range(11):
        window = np.clip(1 - np.abs(place - band), 0, 1)
        part = irfft(spectrum * window, size)[:, :N - start]
        out[:, start:] += amp(PATCHY_DB * drift(12.0)[start:]) * part
    return out


def cutter():
    """Universal motor: its speed closes on the top exponentially and steers both noise and tones."""
    on = np.clip((T - SWITCH_S) / 0.0055, 0, 1)
    since = np.maximum(T - SWITCH_S, 0)
    turns = TOP_TURNS_PER_S - sum(missing * np.exp(-since / tau) for missing, tau in RUN_UP)
    angle = 2 * np.pi * np.cumsum(turns) / SR
    return on * casing(motor_noise(turns, angle, since)), on * motor_tones(turns)


def ports(paths, tones, alike, balance):
    """The right port shares part of the left path by frequency; tones reach both; each has its own colour."""
    first, second = rfft(paths, SIZE)
    lines = rfft(tones, SIZE)
    share = np.clip(at_hz(alike), 0, 1)
    right_gain = amp(-at_hz(balance))
    left = (first + lines) * np.exp(-2j * np.pi * HZ * LEFT_LAG_S)
    right = right_gain * (share * first + np.sqrt(1 - share ** 2) * second + lines)
    # the two gains average one at every frequency
    return irfft(np.array([left, right]) * 2 / (1 + right_gain), SIZE)[:, :N]


def scene():
    """Site and cutter reach the ports with their own balance and likeness."""
    air, hums = background()
    site = ports(air + tile() + spade(), hums + singing(), SITE_ALIKE, SITE_BALANCE)
    return site + ports(*cutter(), CUTTER_ALIKE, CUTTER_BALANCE)


def record(dry):
    """The left port resonates, peaks are rounded, the top is cut."""
    hz, width, port_db = PORT
    b, a = signal.iirpeak(hz, hz / width, fs=SR)
    left = dry[0] + (amp(port_db) - 1) * signal.lfilter(b, a, dry[0])
    rounded = 1.094 * np.tanh(np.array([left, dry[1]]) / 1.453)
    top_cut = signal.ellip(12, 1, 70, CUTOFF_HZ, fs=SR, output="sos")
    return signal.sosfilt(top_cut, rounded)


dry = scene()
out = record(dry)
file_out(out)
```